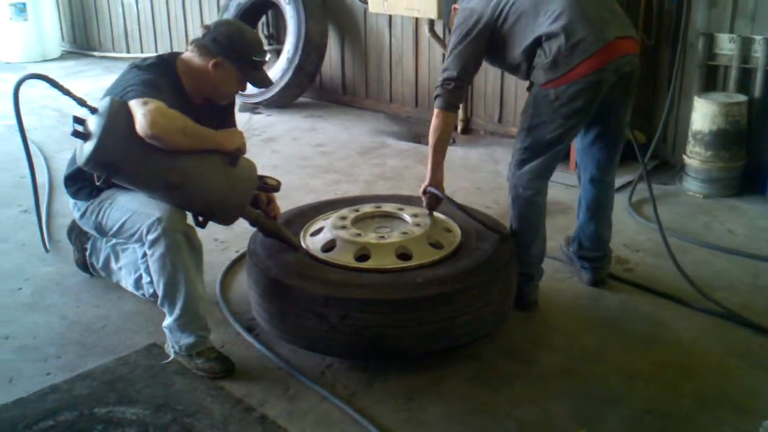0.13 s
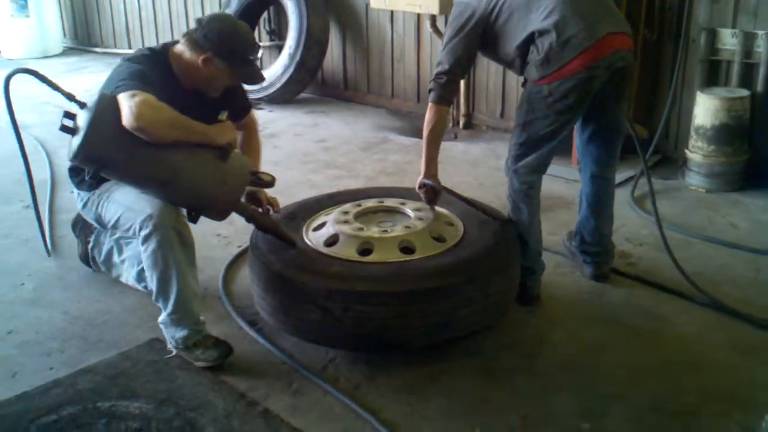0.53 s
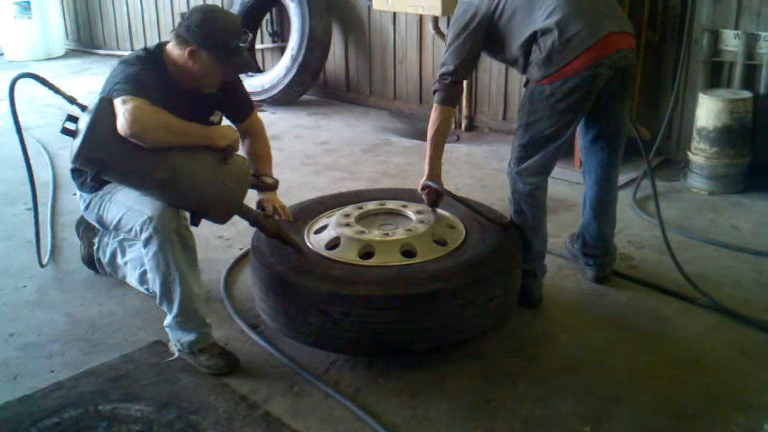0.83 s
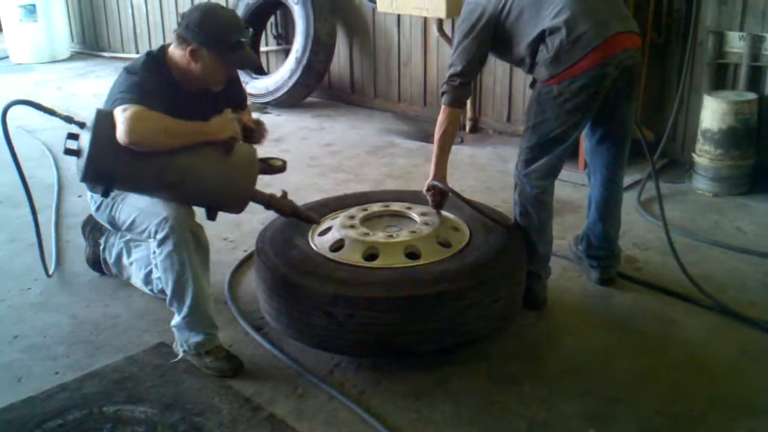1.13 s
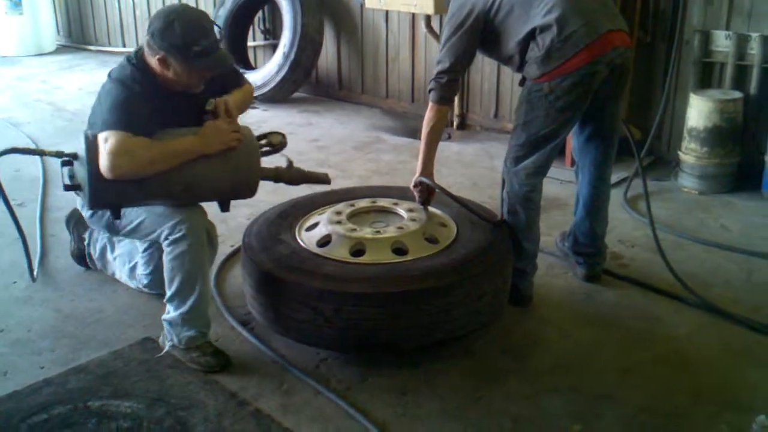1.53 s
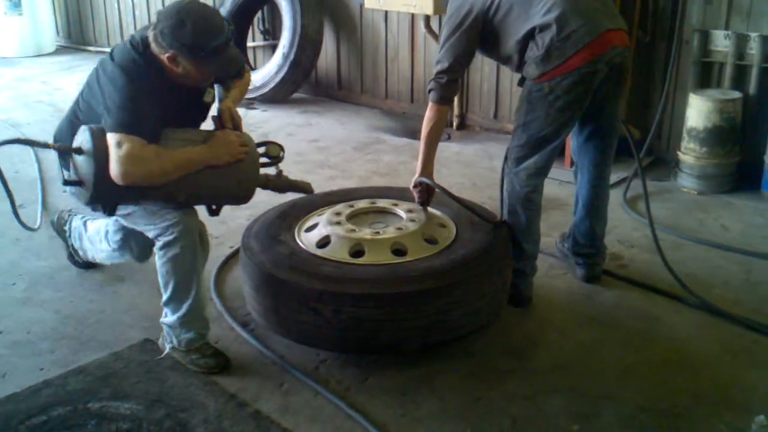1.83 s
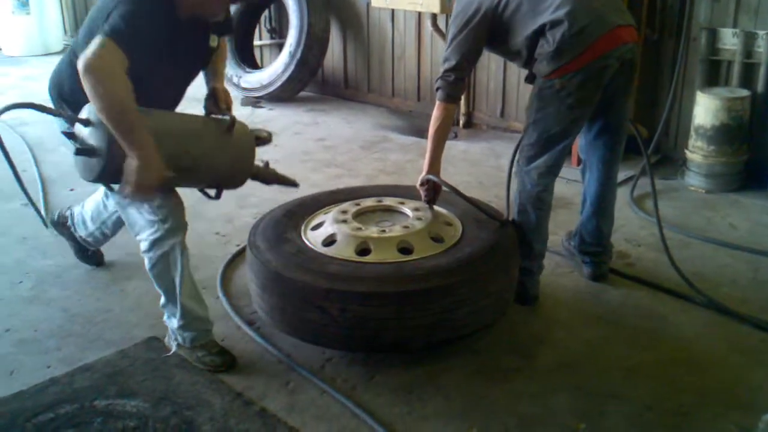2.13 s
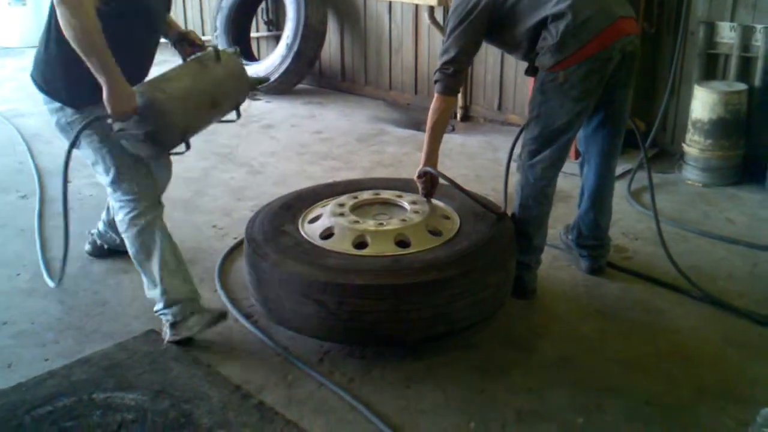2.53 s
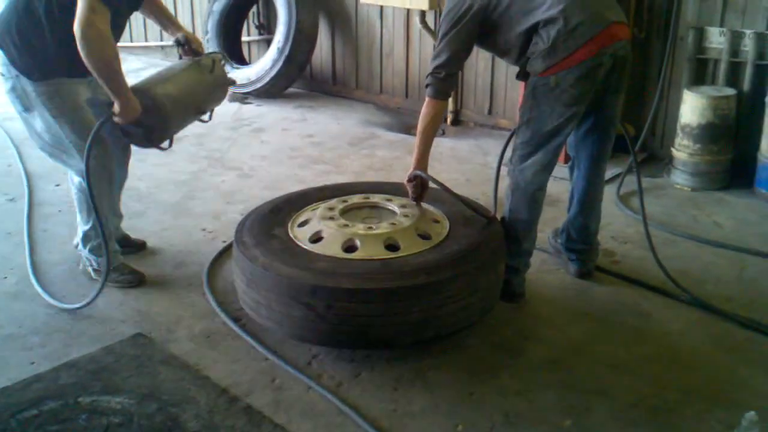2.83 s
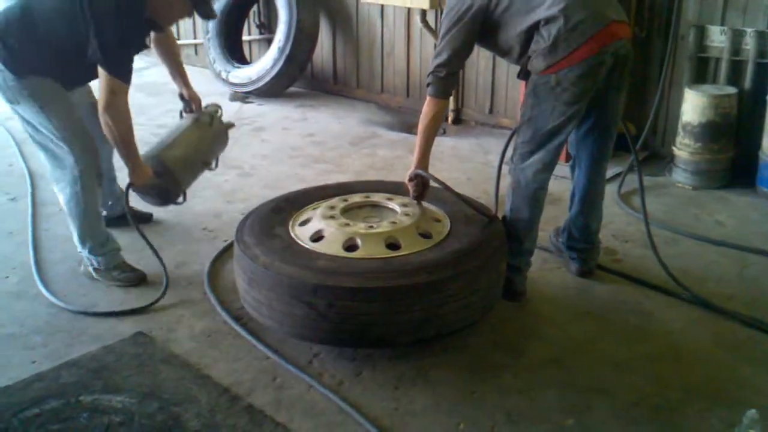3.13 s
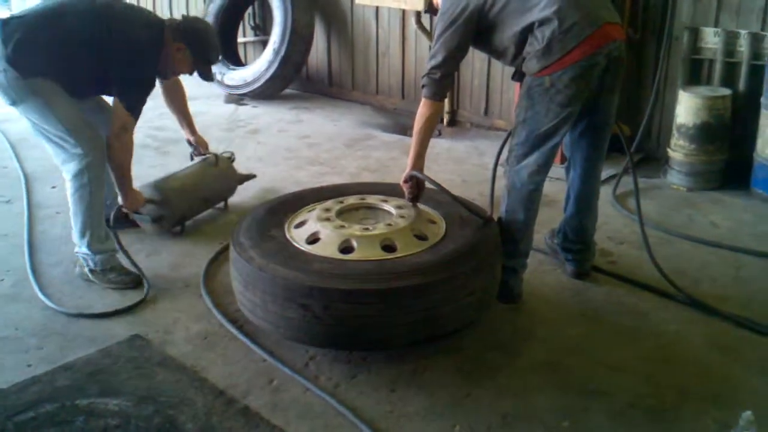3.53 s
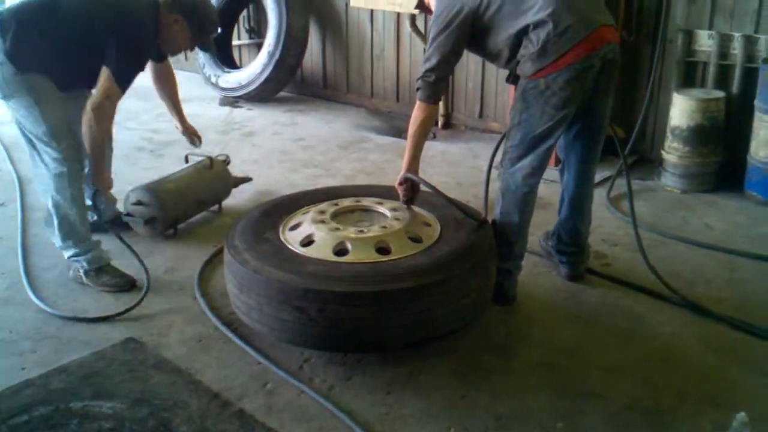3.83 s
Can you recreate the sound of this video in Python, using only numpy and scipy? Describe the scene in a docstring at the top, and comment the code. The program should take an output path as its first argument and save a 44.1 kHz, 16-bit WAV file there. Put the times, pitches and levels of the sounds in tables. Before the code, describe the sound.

Air hisses strongly from a truck tyre, then a tank blast roars and overloads the microphone. The large garage rings out to near quiet, small scuffs follow, and a hissing jet bursts back at the end.

```python
"""Air leaks loudly from a truck tyre in a large garage; a portable tank blasts into it and the hall rings out.
A faint background of hiss, hum and machinery comes up slowly as the recorder's gain recovers, drawn as a curve;
small scuffs follow, near the end air whistles in a pipe, then a jet bursts out. Air is banded noise, whistles
and machinery are noise in resonances, pops and hum are sines. Two microphone ports, their capsules overloaded
to a roar by loud air, are each cross-fed with the other's delayed, inverted signal."""
import sys
import numpy as np
from scipy import signal
from scipy.fft import rfft, irfft, next_fast_len
from scipy.io import wavfile

SR = 44100
rng = np.random.default_rng(int(sys.argv[2]) if len(sys.argv) > 2 else 0)


def invert_db(x):
    """Field ratio 10**(x/20) for x, a level in decibels (scalar or array-like)."""
    u = np.asarray(x, float) / 20
    return 10 ** u


def inscribe(sig):
    """Save sig as 16-bit PCM at rate SR to the path in sys.argv[1].

    A 1-D sig is mono; a 2-D sig holds one channel per row.
    Samples are clipped to [-1, 1] before scaling.
    """
    pcm = np.round(np.clip(np.atleast_2d(sig).T, -1, 1) * 32767)
    wavfile.write(sys.argv[1], SR, pcm.astype(np.int16))


N = 176400
CONTROL_STEP = 32  # samples between control points
PIVOT_HZ = 2200  # brightness slopes turn about this frequency


def rms_one(x):
    """Normalization: scale a signal to unit root-mean-square value."""
    return x / np.sqrt(np.mean(x ** 2) + 1e-20)


def clock():
    """Control-rate sampling: times of the control points in seconds."""
    return np.arange(N // CONTROL_STEP + 2) * CONTROL_STEP / SR


def in_time(rows):
    """Linear interpolation: the columns of a time table at the control points."""
    seconds, *columns = np.transpose(rows)
    return [np.interp(clock(), seconds, column) for column in columns]


def per_sample(control):
    """Linear interpolation: a control curve read at every sample."""
    return np.interp(np.arange(N) / SR, clock(), control)


def at_hz(points, hz):
    """Logarithmic pitch scale: interpolate a frequency table evenly per octave."""
    table_hz, values = np.transpose(points)
    return np.interp(np.log(hz), np.log(table_hz), values)


def density(colour, hz):
    """Spectral density: power per Hz of a colour whose total power is 1."""
    grid_hz = np.linspace(50, 14000, 700)
    total = np.mean(invert_db(2 * at_hz(colour, grid_hz))) * 13950  # mean density times bandwidth
    return invert_db(2 * at_hz(colour, hz)) / total


def drift(rate_hz):
    """Low-pass filtered chance: a slow random control curve of unit rms."""
    r = np.exp(-2 * np.pi * rate_hz * CONTROL_STEP / SR)
    settling = 3000  # control points discarded while the filter settles
    chance = rng.standard_normal(len(clock()) + settling)
    return rms_one(signal.lfilter([1], [1, -2 * r, r * r], chance)[settling:])


# Reverberation of the hall. Each row: frequency in Hz, 60 dB decay time in seconds.
HALL_DECAY = [(100, 0.56), (250, 0.99), (600, 1.04), (2000, 1.164), (4000, 1.065), (7000, 0.91),
              (10000, 0.46), (14000, 0.29)]


def hall(power, hz):
    """Exponential decay of a diffuse field: direct power plus its reverberation at this frequency."""
    t60 = np.clip(at_hz(HALL_DECAY, hz), .1, 3)
    r = invert_db(-120 * CONTROL_STEP / SR / t60)  # a power ratio, so 60 dB in t60
    diffuse = signal.lfilter([1 - r], [1, -r], power, zi=[power[0] * r])[0]
    return power + invert_db(2 * 0.5) * diffuse  # steady reverberation 0.5 dB over direct


# Likeness of the sound at the two ports. Each row: frequency in Hz, correlation from -1 to 1.
PORT_LIKENESS = [(100, .97), (450, 0.94), (800, .75), (1300, -0.16), (2000, 0.16), (2600, -0.46),
                 (3300, 0.19), (4300, 0.14), (5300, 0.13), (6200, 0.015), (14000, 0.03)]


def pair(white, hz, lean_db, loose):
    """Spatial coherence: sum and difference of two noises give the ports their correlation."""
    alike = 0 if loose else np.clip(at_hz(PORT_LIKENESS, hz), -.99, .99)
    common = np.sqrt(1 + alike) * white[0]
    opposed = np.sqrt(1 - alike) * white[1] * [[1], [-1]]
    left_share = 1 / (1 + invert_db(-2 * lean_db))  # lean is left over right
    return (common + opposed) * np.sqrt([left_share, 1 - left_share])


def bank(power_at, patchy_db, rate_hz, lean_db, count, loose=False):
    """Band synthesis of noise: third-octaves flicker about their own power per Hz."""
    out, together = 0, drift(rate_hz)
    edges = 50 * 2 ** (np.arange(count + 1) / 3)
    white = rng.standard_normal((2, 2, N))
    for k, (low, high) in enumerate(zip(edges, edges[1:])):
        hz = np.sqrt(low * high)
        sos = signal.butter(2, [low, high], "band", fs=SR, output="sos")
        band = signal.sosfilt(sos, white[k % 2])  # neighbouring bands use different noises
        flicker_db = patchy_db * (0.37 * together + drift(2 * rate_hz))
        gain = np.sqrt(power_at(hz) * SR / 2) * invert_db(flicker_db)
        out = out + per_sample(gain) * pair(band, hz, lean_db, loose)
    return out


def singing(peaks, power, far=True):
    """Resonance: noise through narrow modes follows a power curve, through the hall if far."""
    out = 0
    for hz, width_hz, db in peaks:
        r = np.exp(-np.pi * width_hz / SR)
        stage = [1, 0, -1, 1, -2 * r * np.cos(2 * np.pi * hz / SR), r * r]
        noise = signal.sosfilt([stage, stage], rng.standard_normal((2, N)))
        heard = hall(power, hz) if far else power
        gain = invert_db(db) * per_sample(np.sqrt(heard))
        out = out + gain * pair(rms_one(noise), hz, np.zeros(1), False)
    return out


# Course of the faint background as the recorder's gain recovers.
# Each row: time in seconds, level in dB, brightness of the hiss in dB per octave.
BACKGROUND_COURSE = [(.8, -81.5, -2), (1.3, -63.5, -3), (1.6, -59.5, -1), (2.0, -57.5, -0.8),
                     (2.5, -54.5, -0.5), (3.0, -52.5, -1), (3.5, -52, 0.2)]
# Spectrum of the background hiss. Each row: frequency in Hz, relative density in dB.
HISS_SPECTRUM = [(60, -24), (100, -8), (140, -3.5), (250, 0), (450, -8.5), (800, -17), (1300, -21),
                 (2000, -18), (3300, 0.5), (4300, -2), (5300, -16), (7000, 7), (9000, -7.5), (11500, -10),
                 (14000, -18)]


def background_hiss(hz):
    """Broadband noise: power per Hz of the hiss, its slope limited to two octaves around the pivot."""
    level_db, bright_db = in_time(BACKGROUND_COURSE)
    octaves = np.clip(np.log2(hz / PIVOT_HZ), -2, 2)
    return invert_db(2 * (level_db + bright_db * octaves)) * density(HISS_SPECTRUM, hz)


def background_power():
    """Gain recovery: one drawn curve brings up hiss, hum and machinery as the recorder's gain recovers."""
    return invert_db(2 * in_time(BACKGROUND_COURSE)[0])


def hum():
    """Amplitude modulation: a low sine of wavering strength, alike in both ports."""
    wavering_db = -9.5 + 2.5 * drift(3.0)  # sine peak against the background level
    gain = np.sqrt(background_power()) * invert_db(wavering_db)
    return per_sample(gain) * np.sin(2 * np.pi * 140 * np.arange(N) / SR)


# Distant machinery. Each row: frequency in Hz, width of each resonator stage in Hz,
# level in dB against the background level before the hall adds to it.
MACHINE_MODES = [(424, 14, -24), (680, 11.8, -30.5), (1006, 16, -26.5), (1244, 16, -29), (1630, 15, -25.5),
                 (2130, 11, -40), (2400, 10, -16), (3280, 19, -18.5), (3350, 15, -19), (4180, 11, -20)]


def machinery():
    """Narrow-band resonance: distant machinery heard through the hall."""
    return singing(MACHINE_MODES, background_power())


# Small movements on the concrete. Each row: start in seconds, level in dB, centre in Hz, length in seconds.
SCUFF_EVENTS = [(1.739, -64.5, 693, 0.02), (2.106, -62.5, 327, .06), (2.366, -65, 594, .04),
                (2.502, -51.5, 9100, .05), (2.805, -58.5, 900, 0.068), (2.795, -48.5, 2100, 0.087),
                (2.856, -56, 2400, 0.045)]


def scuffs(hz):
    """Friction noise: half-sine amplitude swells, power per Hz spread in a bell around each centre."""
    power = 0
    for start, db, centre_hz, length in SCUFF_EVENTS:
        swell = np.sin(np.pi * np.clip((clock() - start) / length, 0, 1)) ** 2
        bell = np.exp(-(np.log2(hz / centre_hz) / 0.51) ** 2)  # 1/e at 0.51 octave
        power = power + invert_db(2 * db) / centre_hz * bell * swell
    return power


# Valve pops. Each row: start in seconds, level in dB, frequency in Hz, 60 dB decay time in seconds.
VALVE_POPS = [(.357, -16, 650, .08), (3.61, -18, 2350, .07), (3.615, -15, 170, .07), (3.672, -28, 230, .07),
              (3.722, -17, 250, .09)]


def pops():
    """Damped oscillation: each valve pop is a quickly rising, dying sine in the left port."""
    out = np.zeros((2, N))
    t = np.arange(int(.2 * SR)) / SR
    for start, db, hz, t60 in VALVE_POPS:
        envelope = invert_db(db - 60 * t / t60) * (1 - np.exp(-t / .003))  # 3 ms rise constant
        out[0, int(start * SR):][:len(t)] += envelope * np.sin(2 * np.pi * hz * t)
    return out


def pipe_flow():
    """Flow envelope: power of the air in the pipe rises quickly, holds and falls quickly."""
    on_s, off_s, ramp_s = 3.472, 3.635, 0.015
    rise = np.clip((clock() - on_s) / ramp_s, 0, 1) ** 2
    return rise * np.clip((off_s - clock()) / ramp_s, 0, 1)


# Spectrum of the breath in the pipe. Each row: frequency in Hz, relative density in dB.
PIPE_SPECTRUM = [(100, -9), (250, -4.5), (1000, -16), (2400, -9.5), (3500, -12), (5000, -20), (7000, -22.5),
                 (14000, -27)]


def pipe_breath(hz):
    """Flow noise: power per Hz of the broad breath that goes with the whistle."""
    return invert_db(2 * -41) * pipe_flow() * density(PIPE_SPECTRUM, hz)


# Modes of the pipe. Each row: frequency in Hz, width of each resonator stage in Hz,
# level in dB against the whistle level.
PIPE_MODES = [(213, 110, -4.5), (643, 120, 0), (787, 50, -10), (1076, 40, -14.5), (1243, 52, -4),
              (1524, 31, -8), (1960, 120, -2.5), (2600, 90, -7), (2897, 94, -10.5), (3595, 82, -12.5)]


def pipe_whistle():
    """Air-column resonance: flow noise rings the pipe's modes, heard without the hall."""
    return singing(PIPE_MODES, invert_db(2 * -38) * pipe_flow(), far=False)


# Course of the capsule overload. Each row: time in seconds, level in dB, left over right in dB.
ROAR_COURSE = [(.358, -62, -2), (.37, -15.5, -2.5), (.4, -17.5, -13.5), (.6, -16, 0.5), (.64, -16, 4),
               (.685, -21, 7), (.7, -24.5, 18), (.76, -32.5, 19), (.775, -80, -1), (3.605, -67, 23),
               (3.62, -36, 10), (3.645, -67, 10), (3.68, -56, 10), (3.71, -31.5, 22), (3.725, -21.5, 1.5),
               (3.9, -20.5, 17), (3.95, -25.5, 4), (4, -36.5, 2)]
# Spectrum of the roar. Each row: frequency in Hz, relative density in dB.
ROAR_SPECTRUM = [(50, -42), (100, -3.5), (250, -0.5), (450, -3.5), (800, -8), (1300, -10), (2500, -11.5),
                 (4500, -15.5), (8000, -35.5)]


def roar():
    """Capsule overload: a rough, lumpy roar while loud air hits the ports, unrelated and often unequal."""
    level_db, lean_db = in_time(ROAR_COURSE)

    def power_at(hz):
        return invert_db(2 * level_db) * density(ROAR_SPECTRUM, hz)
    return bank(power_at, patchy_db=2.0, rate_hz=21.0, lean_db=per_sample(lean_db), count=21, loose=True)


# Course of the emptying tank. Each row: time in seconds, level in dB, brightness in dB per octave.
BLAST_COURSE = [(.352, -71, -2), (.362, -17, 2), (.39, -16.5, 1), (.55, -21.5, 3), (.62, -12, -2),
                (.68, -11, -4.5), (.74, -14.5, -4.5), (.8, -22.5, -11), (.9, -58, -1)]
# Spectrum of the blast. Each row: frequency in Hz, relative density in dB.
BLAST_SPECTRUM = [(100, -32), (300, -12.5), (800, -12.5), (1300, -8), (2000, -2), (2600, 4), (3400, -6.5),
                  (4500, -8), (5500, -7.5), (7000, 0.5), (9000, -1), (14000, -2)]


def blast(hz):
    """Jet turbulence: power per Hz of the tank emptying, sloped only above the pivot."""
    level_db, bright_db = in_time(BLAST_COURSE)
    octaves = max(np.log2(hz / PIVOT_HZ), 0)
    return invert_db(2 * (level_db + bright_db * octaves)) * density(BLAST_SPECTRUM, hz)


# Modes of the wheel. Each row: frequency in Hz, width of each resonator stage in Hz,
# level in dB against the blast before the hall adds to it.
RIM_MODES = [(2110, 35, -19), (3438, 35, -24)]


def rim():
    """Forced resonance: the wheel sings with the blast."""
    return singing(RIM_MODES, invert_db(2 * in_time(BLAST_COURSE)[0]))


# Course of the air escaping at the wheel. Each row: time in seconds, level in dB, brightness in dB per octave.
JET_COURSE = [(0, -25, 0), (.05, -25, 0), (.2, -28, 0.5), (.3, -26, 0.5), (.37, -28.5, 0), (.5, -64.5, -3),
              (3.598, -61.5, 3.5), (3.612, -22, 2), (3.64, -19.5, 0), (3.71, -18.5, 0), (3.8, -21.5, 0.5),
              (3.9, -20.5, 0.44), (4, -17.5, -0.3)]
# Spectrum of the jet. Each row: frequency in Hz, relative density in dB.
JET_SPECTRUM = [(100, -10), (250, -7.5), (800, -12.5), (1300, -9), (2000, -6), (3300, -7), (4500, -10),
                (5500, -18), (7000, 2.5), (9000, 0), (14000, 4)]


def jet(hz):
    """Jet turbulence: power per Hz of the air escaping at the wheel, sloped about the pivot."""
    level_db, bright_db = in_time(JET_COURSE)
    octaves = np.log2(hz / PIVOT_HZ)
    return invert_db(2 * (level_db + bright_db * octaves)) * density(JET_SPECTRUM, hz)


def broadband():
    """Power addition: independent noises add, all but the background hiss through the hall."""
    def power_at(hz):
        direct = jet(hz) + blast(hz) + pipe_breath(hz) + scuffs(hz)
        return hall(direct, hz) + background_hiss(hz)
    return bank(power_at, patchy_db=.6, rate_hz=8.0, lean_db=np.zeros(1), count=25)


def scene():
    """Superposition: the signals of all sources and of the overload add at the two ports."""
    return hum() + machinery() + pops() + pipe_whistle() + roar() + rim() + broadband()


def band_limit(x):
    """A steep low-pass at the top of the band."""
    return signal.sosfilt(signal.butter(12, 14950, fs=SR, output="sos"), x)


# Cross-feed between the ports. Each row: frequency in Hz, share of the other port from 0 to 1.
CROSS_SHARE = [(100, 1.0), (4300, 1.0), (5200, 0.41), (6000, 0.22), (8000, 0.23), (14000, 0.2)]


def record(dry):
    """Delay-and-subtract directivity, then saturation, a steep low-pass and clipping."""
    delay_s, ceiling, cutoff_hz = 17 / 44100, 3.2, 13910
    size = next_fast_len(N + 2048)
    hz = np.maximum(np.fft.rfftfreq(size, 1 / SR), 1)
    ports = rfft(dry, size)
    cross = np.clip(at_hz(CROSS_SHARE, hz), 0, 1) * np.exp(-2j * np.pi * hz * delay_s)
    sides = irfft(ports - cross * ports[::-1], size)[:, :N]
    rounded = ceiling * np.tanh(sides / ceiling)
    low_pass = signal.ellip(12, .5, 80, cutoff_hz, fs=SR, output="sos")
    mix = np.clip(signal.sosfilt(low_pass, rounded), -1, 1)
    return band_limit(mix)


dry = scene()
out = record(dry)
inscribe(out)
```